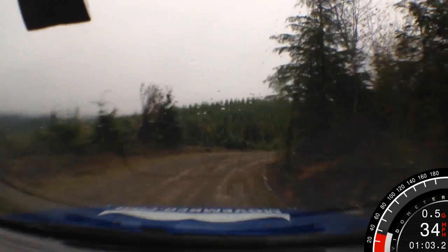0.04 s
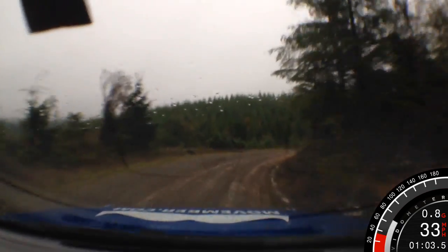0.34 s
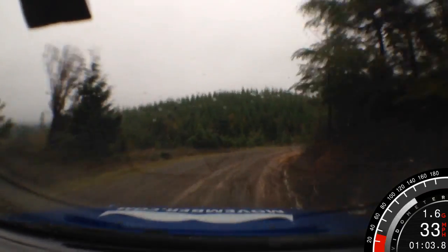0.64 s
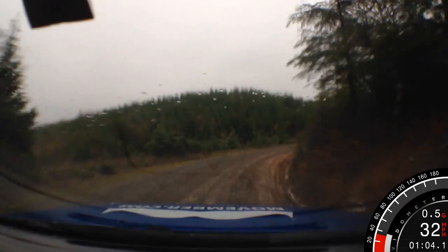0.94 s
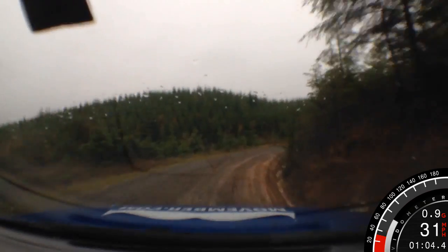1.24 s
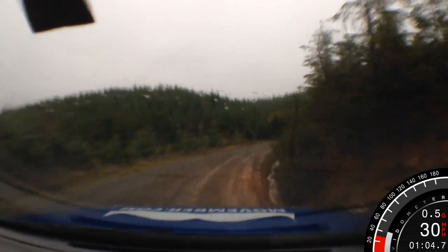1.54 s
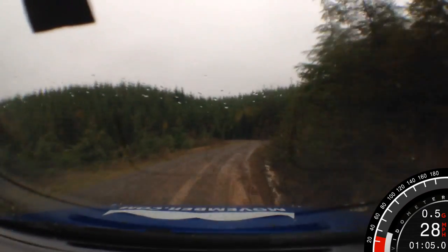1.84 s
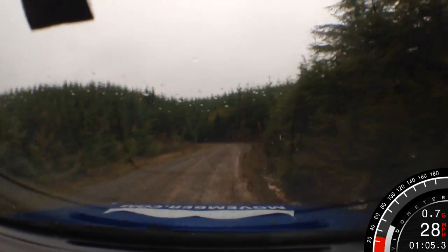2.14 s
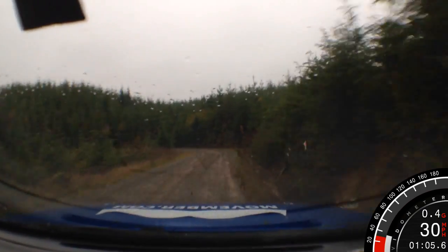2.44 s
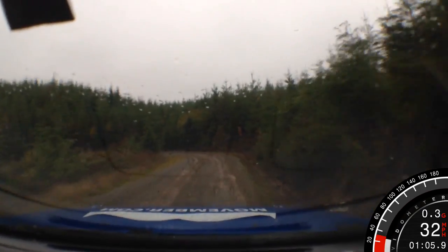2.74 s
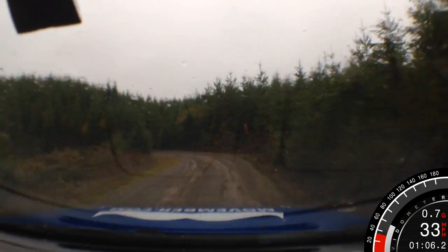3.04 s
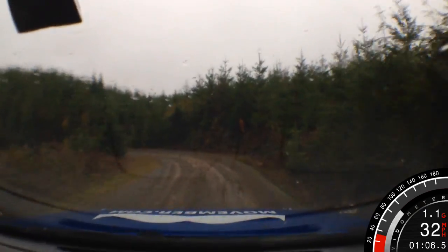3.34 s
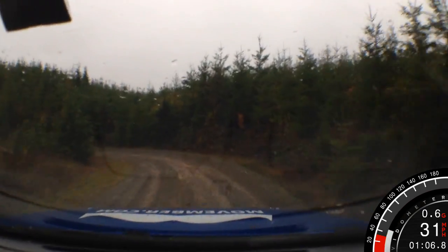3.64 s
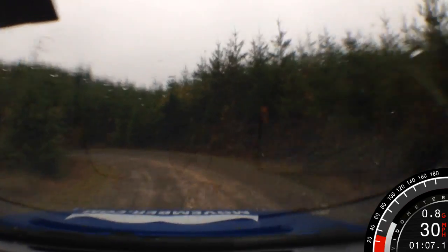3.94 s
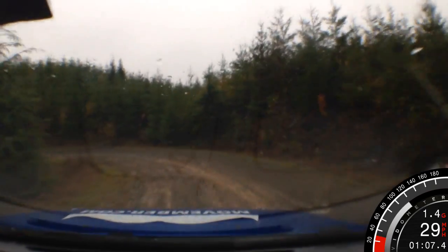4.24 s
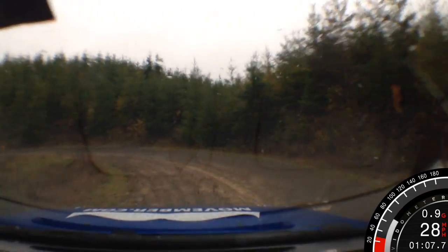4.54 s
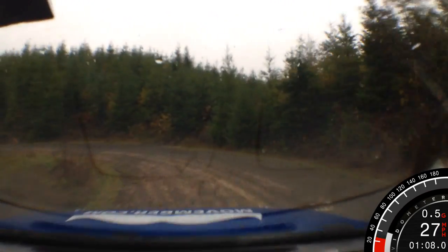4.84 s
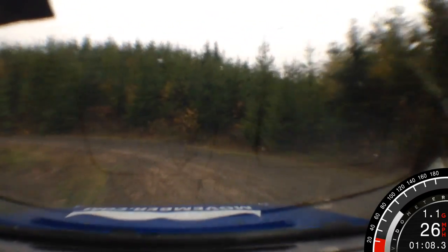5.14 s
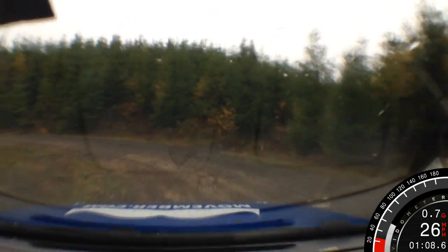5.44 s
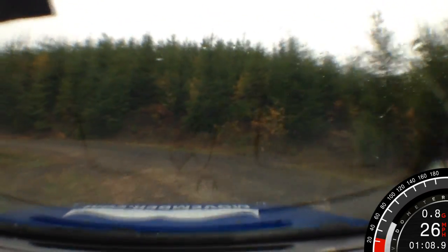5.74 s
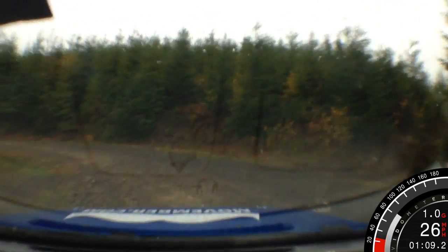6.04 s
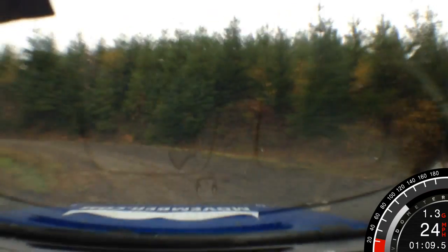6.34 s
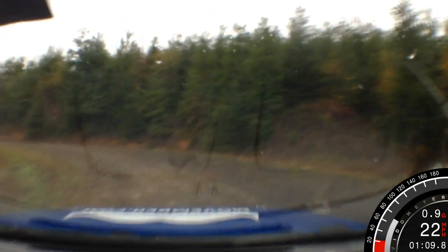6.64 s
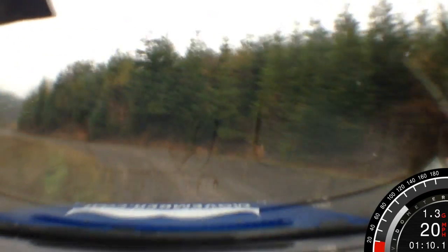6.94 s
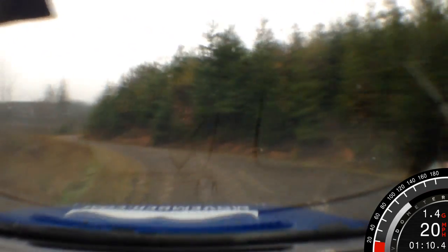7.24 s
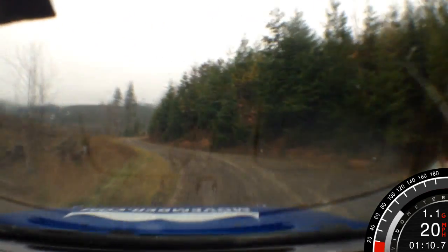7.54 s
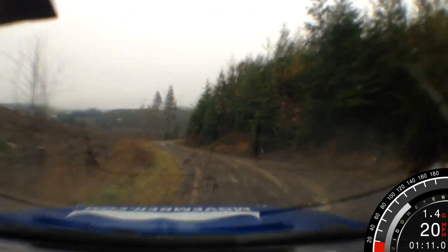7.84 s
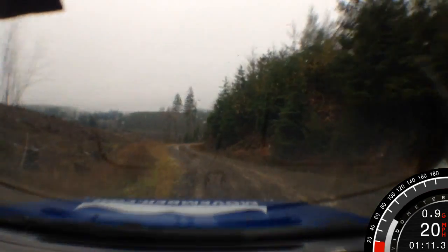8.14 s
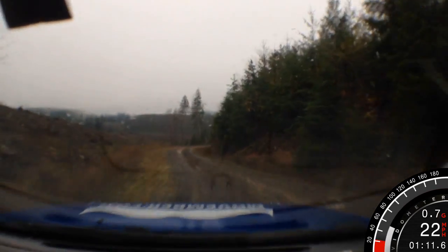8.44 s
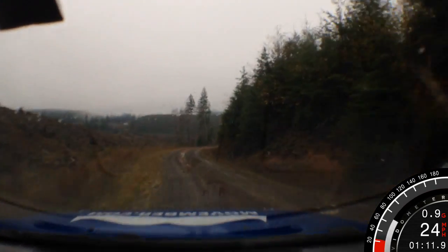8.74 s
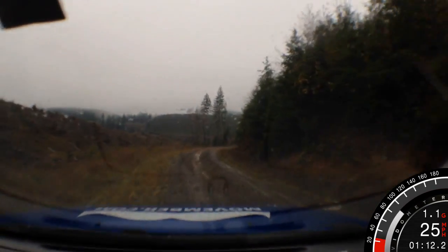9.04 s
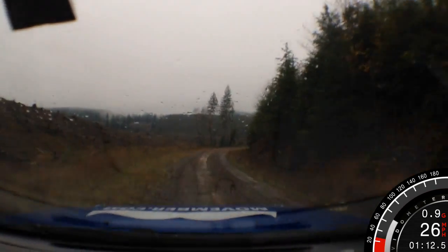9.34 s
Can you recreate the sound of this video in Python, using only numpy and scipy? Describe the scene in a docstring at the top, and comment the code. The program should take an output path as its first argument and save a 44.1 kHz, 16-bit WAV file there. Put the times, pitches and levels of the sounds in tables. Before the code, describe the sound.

Heard from inside a rally car on a gravel road, a rough, throbbing engine and road shocks make the bare cabin boom deeply throughout. Gravel drums and clatters in the wheel arches, single stones knock on the floor, and bright ticks crackle over the bumps. A metal part rings briefly now and then. The gravel sprays harder in the second half, and near the end the engine rises in pitch as the car pulls away.

```python
"""Inside a rally car on gravel

The car eases off for a corner on a forest road, slides through it and pulls away. Road shocks and a
rough engine make the bare cabin boom. Gravel drums and sprays in the wheel arches, single stones knock
on the floor, short bright ticks crackle at the loud bumps, and now and then a metal part rings."""
import sys
import numpy as np
from scipy import signal
from scipy.fft import rfft, irfft
from scipy.io import wavfile
from scipy.ndimage import uniform_filter1d, minimum_filter1d

SR = 44100
rng = np.random.default_rng(int(sys.argv[2]) if len(sys.argv) > 2 else 0)


def transcribe(signal):
    """Save signal, clipped to [-1, 1], as a 16-bit WAV file at the path in sys.argv[1]."""
    frames = np.atleast_2d(signal).T
    limited = np.clip(frames, -1, 1)
    pcm = np.round(limited * 32767).astype(np.int16)
    wavfile.write(sys.argv[1], SR, pcm)


N = 414099

# The engine's pace. Each row: time in seconds, firings per second, drone level in dB.
ENGINE_REVS = [(0, 131.2, -35), (.65, 132.7, -39), (1.4, 132, -28), (1.65, 133.8, -37), (2.1, 133.8, -33.5),
               (2.75, 130, -24.5), (3.2, 138.2, -30), (3.9, 142, -27), (4.5, 129, -31), (5.7, 134.7, -39.5),
               (7.6, 131.3, -37), (8.03, 132, -31), (8.3, 136.1, -22), (8.7, 141, -36.5),
               (9.1, 152.1, -26.5), (9.39, 158.4, -22)]
# Notes at which the cabin's air and body ring. Each row: pitch in Hz, width in Hz, level in dB.
CABIN_NOTES = [(45.7, 9.7, -11.5), (88, 10.15, 0), (144.3, 23.8, -0.5), (175.6, 19.5, -1), (209, 41, -7.5),
               (259.1, 29.5, -11.5)]
# The mix of the boom. Each row: time in seconds, then heave and firings in dB against the road shocks.
BOOM_MIX = [(.3, -21, -7.5), (1.7, -18.5, -11), (3.4, -24.5, -7), (4.2, -19.5, -9), (5.6, -22, -8),
            (6.6, -16.5, -4.5), (7.6, -19, -8), (8.3, -18, -6), (8.8, -23, -8.5)]
# Steady rolling. Each row: time in seconds, then boom, drumming, clatter and spray levels in dB.
ROLLING = [(0.25, -13, -23.5, -61, -68), (0.5, -11.0, -21, -49.0, -60), (1.5, -11, -20, -45, -60.5),
           (1.85, -13, -25, -59, -66), (2.7, -13.0, -21.5, -47, -61.0), (3.15, -12, -23.5, -55.5, -63),
           (3.75, -12, -22.5, -55, -64), (4.2, -13, -23.5, -53.5, -60.5), (5.05, -11.5, -21.5, -47, -65),
           (5.38, -15, -24, -58.5, -65), (5.65, -12.0, -21.5, -52.5, -65.5),
           (6.4, -11, -21.0, -42.5, -59.5), (7.2, -12.5, -21.0, -46, -53.5), (7.9, -10.5, -19.5, -52, -59),
           (8.07, -14.5, -25.5, -53, -66), (8.45, -13.0, -18.5, -42.5, -51),
           (8.95, -9.5, -21.0, -52.5, -67.5), (9.3, -16, -21, -49, -69)]
# Bumps and ruts. Each row: start and length in seconds, then boom, clatter and tick levels in dB.
ROAD_BUMPS = [(0.005, 0.04, -8, -40.5, -21.5), (0.151, 0.021, -12, -41.5, -26),
              (0.35, 0.097, -13, -42, -18), (0.618, 0.038, -12.0, -44, -27), (0.759, 0.05, -13, -40, -34),
              (0.884, 0.054, -16, -43.0, -34), (0.996, 0.018, -9, -36.5, -19.5),
              (1.073, 0.084, -13.5, -52, -34), (1.262, 0.225, -13, -39.0, -31),
              (1.525, 0.138, -13.5, -40, -33), (1.71, 0.03, -16, -39.5, -22), (1.913, 0.023, -10, -38, -22),
              (2.008, 0.011, -17, -46.5, -34), (2.127, 0.064, -11.5, -39, -27),
              (2.281, 0.054, -12, -40.5, -26), (2.516, 0.107, -16.0, -46, -26.5),
              (2.825, 0.066, -11.5, -48.0, -30.5), (2.963, 0.039, -12, -58, -36),
              (3.216, 0.053, -12, -50.5, -40), (3.34, 0.06, -15.5, -50, -30.5),
              (3.506, 0.037, -13, -50, -45), (3.583, 0.035, -19.5, -42, -22.5),
              (3.884, 0.153, -9, -51, -43), (4.082, 0.1455, -11, -42.5, -30.5),
              (4.294, 0.1108, -11.5, -42, -34), (4.587, 0.109, -11.5, -56.0, -37.5),
              (4.845, 0.058, -7.5, -41, -26), (5.139, 0.128, -10.0, -41, -39),
              (5.534, 0.037, -6.5, -40, -30.5), (5.681, 0.069, -11.0, -58, -50),
              (6.132, 0.071, -10.5, -52.5, -25.5), (6.293, 0.031, -9, -53, -22.5),
              (6.434, 0.172, -13.0, -46.5, -30), (7.03, 0.036, -12.5, -38, -30),
              (7.266, 0.062, -8, -38, -28), (7.397, 0.077, -11.5, -38.5, -18),
              (7.553, 0.052, -25, -43.0, -18.5), (7.729, 0.107, -11.5, -37.5, -22.5),
              (7.962, 0.02, -7.5, -38, -20), (8.592, 0.042, -9, -40, -21.5), (8.712, 0.012, -11, -39, -22),
              (8.787, 0.037, -10, -57, -39), (9.076, 0.105, -16.5, -45.5, -24.5),
              (9.312, 0.059, -9, -61, -38)]
# Gravel flung at the floor. Each row: start and length in seconds, then drumming, clatter, spray in dB.
GRAVEL_SHOWERS = [(.437, .04, -24, -51, -57), (1.07, .03, -20, -37.5, -65), (1.418, .044, -17.5, -49, -63),
                  (1.557, .054, -19.5, -50, -62), (1.788, .004, -19, -39.5, -51),
                  (2.605, .03, -23.5, -40, -64), (2.958, .011, -19, -44, -65), (5.048, .024, -16, -45, -66),
                  (5.593, 0.057, -20.5, -49, -68), (6.117, 0.037, -20, -44.5, -58),
                  (6.53, 0.014, -26, -40, -46), (6.645, .012, -11, -28, -39),
                  (6.68, .015, -20.5, -30.5, -42), (6.818, 0.016, -10.5, -31.5, -50),
                  (6.86, 0.019, -20, -35, -59), (7.125, 0.0086, -29, -39, -43),
                  (7.165, .03, -22, -34.5, -43), (7.225, .01, -22, -39, -52), (7.285, 0.026, -24, -42, -47),
                  (7.64, .08, -18.5, -40.5, -59), (7.867, .034, -18.5, -38, -57),
                  (8.18, .025, -24.5, -41, -58), (8.309, 0.024, -26, -34.5, -48.5),
                  (8.459, 0.076, -17.5, -44, -54), (8.855, .11, -20.5, -39, -54)]
# Single large stones. Each row: time in seconds, level in dB.
STONE_HITS = [(0.4617, -18), (0.5407, -17), (0.61, -12.5), (0.6484, -10), (2.8357, -14.5), (3.203, -9),
              (3.239, -9), (3.2742, -10.5), (4.101, -17.5), (4.3385, -14), (4.5023, -15.5), (4.9462, -13.5),
              (5.022, -19), (5.5553, -5), (5.658, -13), (6.1524, -13.5), (6.319, -13), (6.4276, -13),
              (6.6469, -8), (6.7588, -12.5), (7.1601, -16), (7.6873, -10), (7.7667, -6.5), (7.8158, -13),
              (7.8471, -10.5), (8.849, -10), (8.8894, -11.5), (8.961, -14.5)]
# The floor's ring under a large stone. It lists pitch in Hz, width in Hz, level in dB.
FLOOR_RING = (910, 250, 3)
# The loudest of the sharp ticks. Each row: time in seconds, level in dB.
LOUD_TICKS = [(0.026, -19), (0.169, -21), (0.192, -19.5), (0.399, -20), (0.41, -13), (0.649, -20),
              (0.78, -19), (0.878, -20.5), (0.923, -18), (0.934, -13.5), (1.075, -17), (1.126, -13),
              (1.282, -15), (1.315, -15), (1.349, -17.5), (1.385, -15.5), (1.432, -14.5), (1.454, -13),
              (1.477, -17), (1.544, -15), (1.609, -16.5), (1.668, -16.5), (1.732, -21), (1.868, -22),
              (2.191, -19), (2.283, -19.5), (2.305, -12.5), (2.609, -22), (2.67, -20.5), (2.964, -20.5),
              (3.387, -23.5), (3.614, -14), (3.624, -24), (3.968, -24), (4.15, -21.5), (4.239, -16.5),
              (4.295, -20), (4.365, -21), (4.694, -21.5), (4.976, -11.5), (5.212, -14), (5.234, -12),
              (5.244, -23), (5.255, -12.5), (5.915, -25.5), (6.158, -17.5), (6.181, -20), (6.242, -19.5),
              (6.286, -20), (6.431, -21), (6.494, -20.5), (6.575, -16), (6.766, -21.5), (7.046, -15.5),
              (7.261, -19), (7.295, -17), (7.369, -22), (7.411, -17), (7.476, -18), (7.73, -16),
              (7.767, -14.5), (7.773, -15), (7.841, -22), (7.986, -21), (8.103, -23.5), (8.262, -19.5),
              (8.332, -18), (8.474, -27), (8.592, -24), (8.893, -22), (9.212, -25), (9.279, -28)]
# Ringing metal parts. Each row: start in seconds, pitch in Hz, level in dB, seconds to fade by 60 dB.
METAL_RINGS = [(1.845, 1056, -26, 0.18), (5.275, 1020, -25, 0.085), (8.309, 800, -22, 0.15)]

# The tone of each sound, from low to high. Each row: frequency in Hz, relative level in dB.
HEAVE_TONE = [(5, -14), (14, -6.5), (28, -8), (60, 1.5), (120, -6.5), (400, -53), (1500, -81)]  # body
DRUM_TONE = [(120, -34.5), (230, -9), (290, -2.5), (330, -2), (360, -2.5), (405, 0), (480, -5), (570, -12),
             (650, -14.5), (760, -23), (950, -29.5), (1500, -48.5), (3000, -81)]  # wheel arches and floor
CLATTER_TONE = [(400, -17), (750, 6.5), (950, 1), (1180, 4.5), (1350, -3.5), (1550, -8.5), (2100, -11.5),
                (2600, -20), (3200, -24), (3800, -28.5), (7000, -36.5), (11000, -54)]  # gravel heard through the panels
SPRAY_TONE = [(1200, -10), (2000, 1), (2600, 3), (3150, 3.5), (3750, -3.5), (5300, 0), (7200, -4),
              (8300, -13), (10500, -23), (15000, -34)]  # fine grit along the underside
KNOCK_TONE = [(250, -10), (650, -3), (900, 0), (1150, -1), (1600, -11), (2100, -7), (2600, -13),
              (3150, -15), (3800, -26), (5500, -29), (8000, -36), (14000, -58)]  # a stone on the floor
TICK_TONE = [(1000, -22), (2500, -13), (3500, 2), (5500, 3), (7300, -1.5), (8600, 0.5), (9700, -8.5),
             (11000, -23), (15000, -28.5)]  # a short, bright tick


def cabin_boom(gain, note_db=-14):
    """Road shocks and firings shake the car, while the engine note throbs and the body heaves below."""
    firings, note, drone = engine()
    shocks = cabin_ring(rng.standard_normal(N))
    heave = colour(rng.standard_normal(N), HEAVE_TONE)
    heave_db, firing_db = curves(BOOM_MIX)
    shake = shocks + undb(firing_db) * firings + undb(note_db) * note + undb(heave_db) * heave
    return steady(shake, .11) * gain + drone


def engine(flutter=0.0126, surge=0.0382, scatter_db=4.5, uneven_db=3, waver_db=3):
    """Four cylinders fire unevenly into the cabin; the panels drone at three times the firing rate."""
    hz, drone_db = curves(ENGINE_REVS)
    slip, load, flex = unit(uniform_filter1d(rng.standard_normal((3, N)), size=3000))
    cycles = np.cumsum(hz * (1 + flutter * slip)) / SR  # the revs flutter as the wheels slip and grip
    fired = np.flatnonzero(np.diff(np.floor(cycles)))
    cylinder = np.resize([0.77, 0.47, -0.39, -1.8], len(fired))  # each has its own strength
    sizes = undb(uneven_db * cylinder + scatter_db * rng.standard_normal(N)[:len(fired)])
    drift = np.cumsum(hz * surge * flex) / SR  # the note wavers as the body flexes
    note = unit(np.sin(2 * np.pi * (cycles + drift)) * undb(waver_db * load))
    drone = np.sin(6 * np.pi * cycles) * undb(drone_db + waver_db * load)
    return cabin_ring(pulses(fired / SR, sizes)), note, drone


def cabin_ring(x, top_hz=290):
    """The cabin rings at its own low notes and lets little through above them."""
    ringing = sum(ring(x, *note) * (-1) ** k for k, note in enumerate(CABIN_NOTES))
    return unit(signal.sosfilt(signal.butter(4, top_hz, fs=SR, output="sos"), ringing))


def gravel(drum_gain, clatter_gain, spray_gain, crunch_db=3):
    """Tyres throw stones at the wheel arches: heavy ones drum, small ones clatter, grit hisses."""
    heavy = grains(per_s=1400, scatter_db=2.5)
    small = add_tail(grains(per_s=650, scatter_db=3.5), fade_s=0.037, tail_db=6.5)
    grit = add_tail(grains(per_s=1000, scatter_db=5), fade_s=0.036, tail_db=6.5)
    drum = steady(colour(heavy, DRUM_TONE), 0.092) * drum_gain * undb(0.93)
    clatter = steady(colour(small, CLATTER_TONE), 0.057) * clatter_gain * undb(0.42)
    spray = steady(colour(grit, SPRAY_TONE), 0.04) * spray_gain * undb(-1.7)
    clumps = unit(undb(crunch_db * wander(700)))  # the tread lets go of its gravel in clumps
    return drum + clumps * (clatter + spray)


def stone_knocks():
    """Large stones crack against the floor, which rings briefly."""
    times, db = np.transpose(STONE_HITS)
    landed = times + .0011 + .0002 * rng.standard_normal(len(times))
    hits = add_tail(pulses(landed, undb(db)), fade_s=0.016, tail_db=-2)
    crack = colour(hits, KNOCK_TONE)
    return crack + ring(crack, *FLOOR_RING)


def sharp_ticks(clatter_gain, repeat_s=0.014, repeat_db=-15, copy_s=.00025, copy_db=-5):
    """Short, bright ticks crackle at the loud bumps, each followed by a fainter one."""
    starts, db = np.vstack([LOUD_TICKS, stray_ticks(clatter_gain), bump_ticks()]).T
    gap, scatter = rng.standard_normal((len(starts), 2)).T
    times = np.concatenate([starts, starts + repeat_s * np.abs(gap)])
    sizes = undb(np.concatenate([db, db + repeat_db + 4 * scatter]))
    clicks = pulses(times, sizes)
    for wait, strength in rng.random((3, 2, len(times))):  # three close copies vary each tick's tone
        times = times - copy_s * np.log(1 - wait)
        clicks += pulses(times, sizes * undb(copy_db) * (2 * strength - 1))
    return colour(add_tail(clicks, fade_s=0.012, tail_db=-14.5), TICK_TONE)


def bump_ticks(per_s=30, scatter_db=2.5, most=14):
    """Ticks come at uneven gaps while each bump lasts. Each row: time in seconds, level in dB."""
    start, length, _, _, db = np.transpose(ROAD_BUMPS)[:, :, None]
    age = (np.arange(most) + rng.random((len(start), most)) - .5) / per_s
    tick_db = db + scatter_db * rng.standard_normal(age.shape)
    during = age < length
    return np.column_stack([(start + age)[during], tick_db[during]])


def stray_ticks(clatter_gain, per_s=7, above_clatter_db=20.5, loudest_db=-19):
    """Random ticks, louder when the gravel is loud. Each row: time in seconds, level in dB."""
    at = np.flatnonzero(rng.random(N) < per_s / SR)
    db = np.minimum(20 * np.log10(clatter_gain[at]) + above_clatter_db, loudest_db)
    return np.column_stack([at / SR, db])


def metal_pings(rise_s=0.01, waver_hz=35):
    """Shaken metal parts ring with an unsteady pitch and die away."""
    out = np.zeros(N)
    drift = np.cumsum(waver_hz * wander(300)) / SR
    for start, hz, db, fade_s in METAL_RINGS:
        age = np.maximum(np.arange(N) / SR - start, 0)
        rise = np.minimum(age / rise_s, 1)
        fade = 0.001 ** np.minimum(age / fade_s, 10)
        out += undb(db) * rise * fade * np.sin(2 * np.pi * (hz * age + drift))
    return out


def road_gains(bump_drum_db=-15, bump_spray_db=-18.5):
    """Bumps and showers add to the steady rolling, setting how loud the boom and the gravel are."""
    boom, drum, clatter, spray = undb(curves(ROLLING)) ** 2
    bump_boom, bump_clatter, _ = swells(ROAD_BUMPS)
    shower_drum, shower_clatter, shower_spray = swells(GRAVEL_SHOWERS)
    return np.sqrt([boom + bump_boom,
                    drum + shower_drum + bump_boom * undb(bump_drum_db) ** 2,
                    clatter + shower_clatter + bump_clatter,
                    spray + shower_spray + bump_clatter * undb(bump_spray_db) ** 2])


def swells(table, rise_s=0.026, fall_s=0.034):
    """The power of each level column: an event rises before its start, holds, then falls."""
    t = np.arange(N) / SR
    power = np.zeros((len(table[0]) - 2, N))
    for start, length, *db in table:
        corners = np.cumsum([start - rise_s, rise_s, length, fall_s])
        span = slice(*np.searchsorted(t, corners[[0, -1]]))
        power[:, span] += np.outer(undb(db), np.interp(t[span], corners, [0, 1, 1, 0])) ** 2
    return power


def grains(per_s, scatter_db):
    """Random impacts, many small and a few large."""
    hit = rng.random(N) < per_s / SR
    return hit * rng.choice([-1, 1], N) * undb(scatter_db * np.minimum(rng.exponential(size=N), 4))


def pulses(times, sizes):
    """One sharp push at each time, given in seconds."""
    return np.bincount(np.clip(times * SR, 0, N).astype(int), sizes, N + 1)[:N]


def add_tail(x, fade_s, tail_db):
    """Follow each push with noise that fades by 60 dB in fade_s seconds."""
    keep = undb(-120 / (fade_s * SR))
    power = signal.lfilter([1 - keep], [1, -keep], x ** 2 + 1e-18)
    return x + undb(tail_db) * np.sqrt(power) * rng.standard_normal(N)


def ring(x, hz, width_hz, db):
    """Let a sound ring around one pitch."""
    return undb(db) * signal.lfilter(*signal.iirpeak(hz, hz / width_hz, SR), x)


def colour(x, tone, size=4096):
    """Filter a sound so that it takes on the lows and highs of a tone table."""
    hz, db = np.transpose(tone)
    grid = np.maximum(np.arange(size // 2 + 1) * SR / size, 1)
    cepstrum = irfft(np.log(undb(np.interp(np.log(grid), np.log(hz), db))))
    # folding this makes the filter ring only after a hit, never before
    cepstrum[1:size // 2] *= 2
    cepstrum[size // 2 + 1:] = 0
    response = irfft(np.exp(rfft(cepstrum)))
    return signal.fftconvolve(x, response / np.linalg.norm(response))[:N]


def steady(x, span_s):
    """Even out the level over spans of this length, keeping faster flutter."""
    return x / np.sqrt(np.abs(uniform_filter1d(x ** 2, int(span_s * SR) + 1)) + 1e-18)


def wander(samples):
    """A random drift: noise smoothed over this many samples."""
    return unit(uniform_filter1d(rng.standard_normal(N), size=samples))


def curves(table):
    """Join a table's timed rows with straight lines, one curve for each value column."""
    times, *columns = np.transpose(table)
    return [np.interp(np.arange(N) / SR, times, column) for column in columns]


def unit(x):
    """Scale to an average power of 1."""
    return x / np.sqrt(np.mean(x ** 2))


def undb(db):
    """Turn decibels into a number to multiply by."""
    return 10 ** (np.asarray(db) / 20)


def scene(hiss_db=-80):
    """Everything is heard from one spot behind the windscreen, over a faint hiss."""
    boom, drum, clatter, spray = road_gains()
    hiss = undb(hiss_db) * rng.standard_normal(N)
    mix = cabin_boom(boom) + gravel(drum, clatter, spray) + stone_knocks()
    return (mix + sharp_ticks(clatter) + metal_pings() + hiss)[None]


def record(dry, top_hz=15200):
    """Turn the level down briefly at peaks above full scale, then cut the highest treble."""
    room = 1 / np.maximum(np.abs(dry), 1)
    gain = uniform_filter1d(minimum_filter1d(room, size=400), size=400)
    return signal.sosfilt(signal.ellip(8, .2, 70, top_hz, fs=SR, output="sos"), dry * gain)


dry = scene()
out = record(dry)
transcribe(out)
```